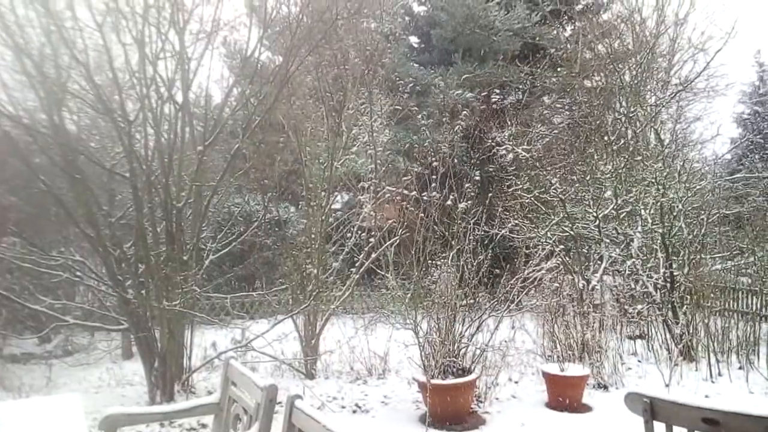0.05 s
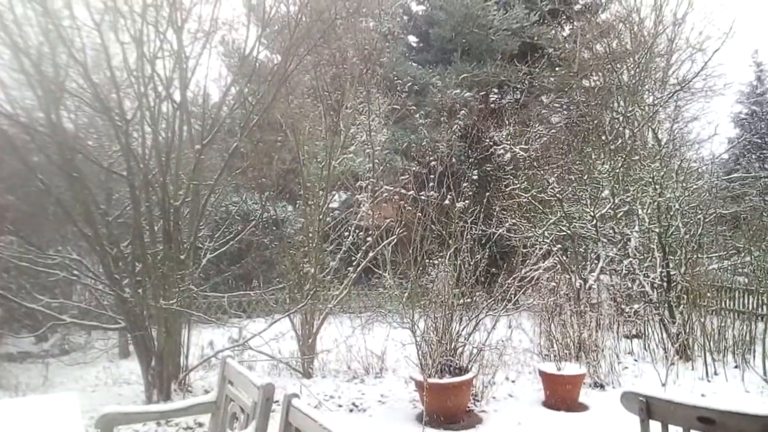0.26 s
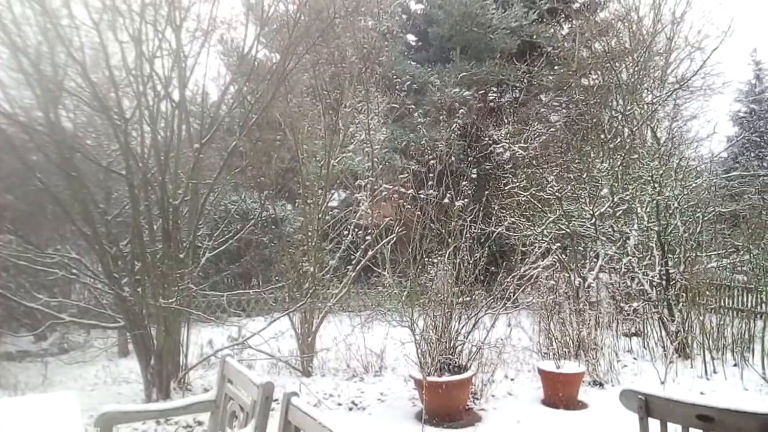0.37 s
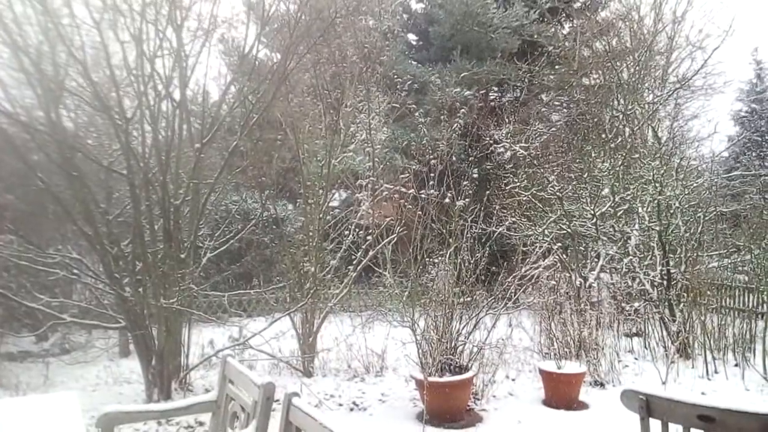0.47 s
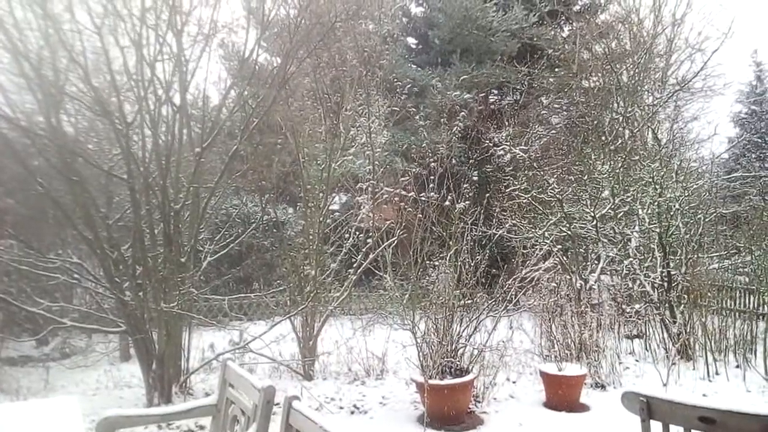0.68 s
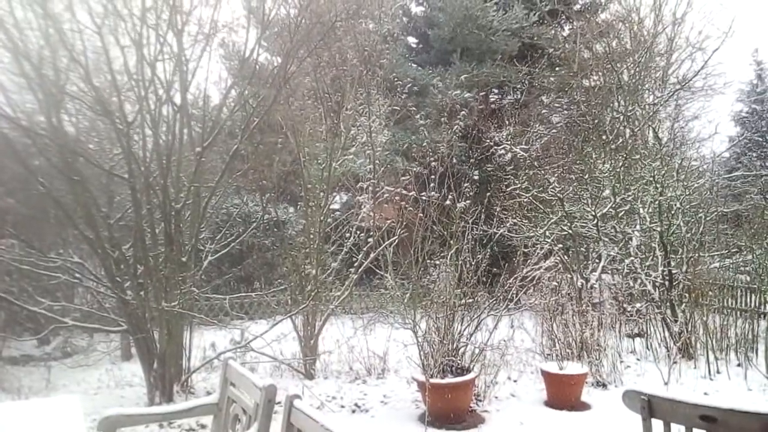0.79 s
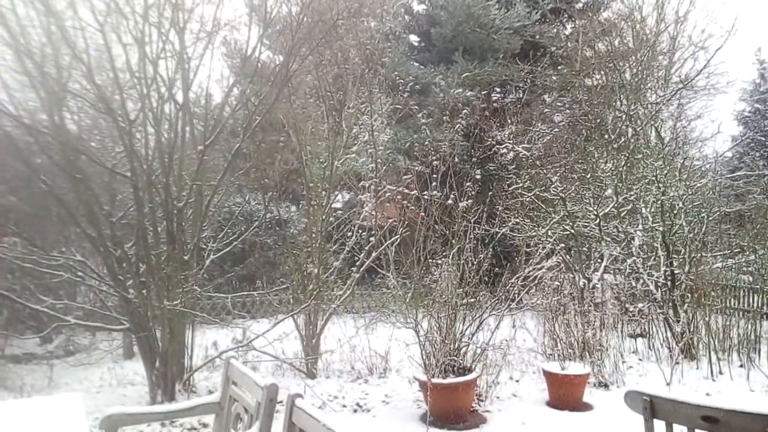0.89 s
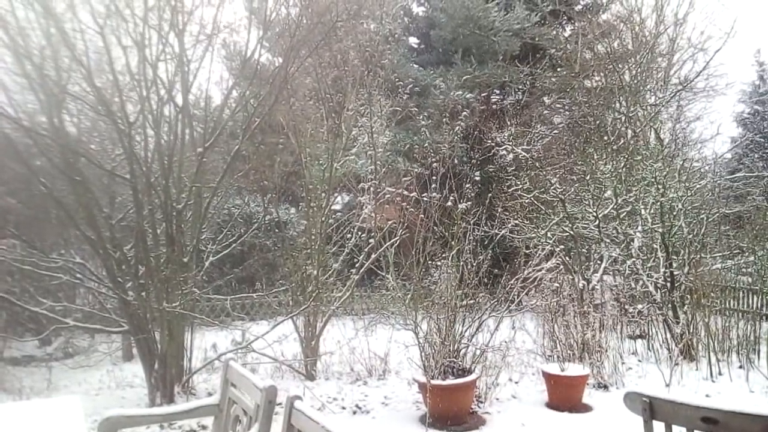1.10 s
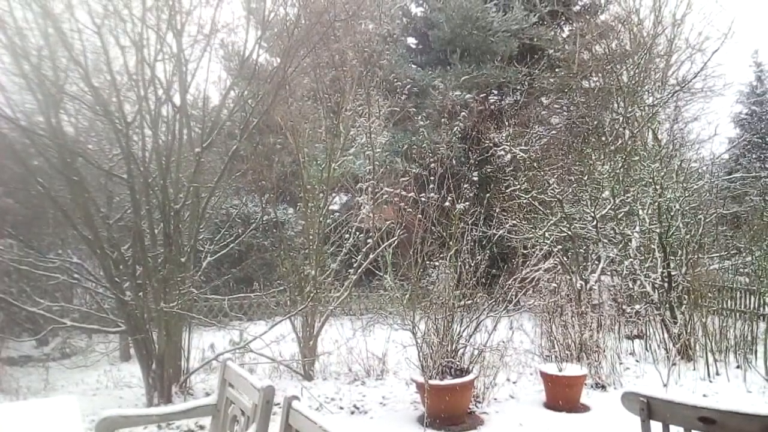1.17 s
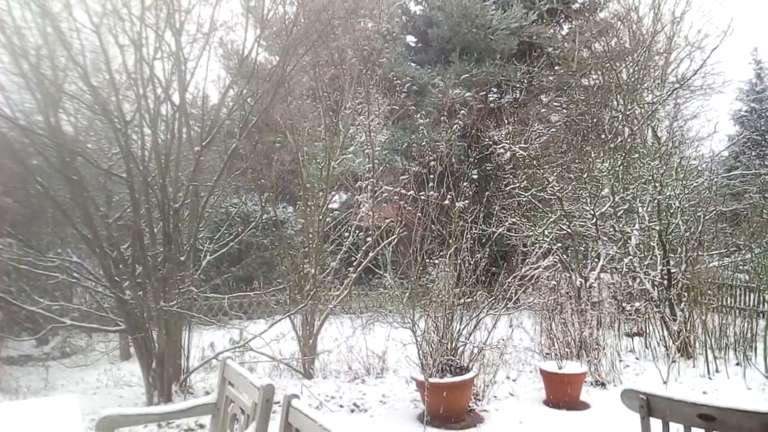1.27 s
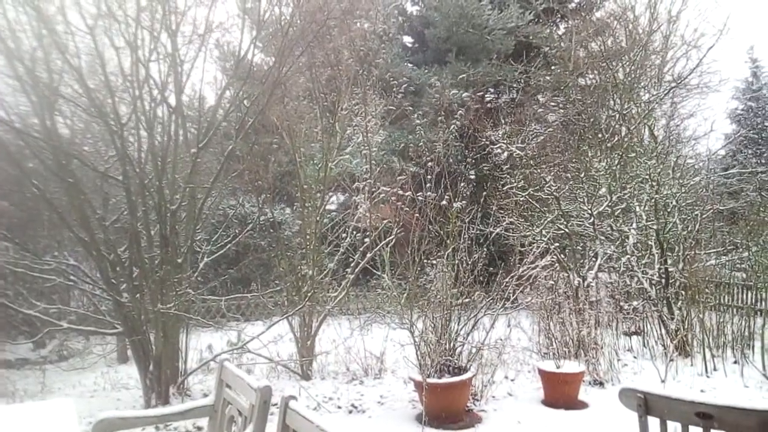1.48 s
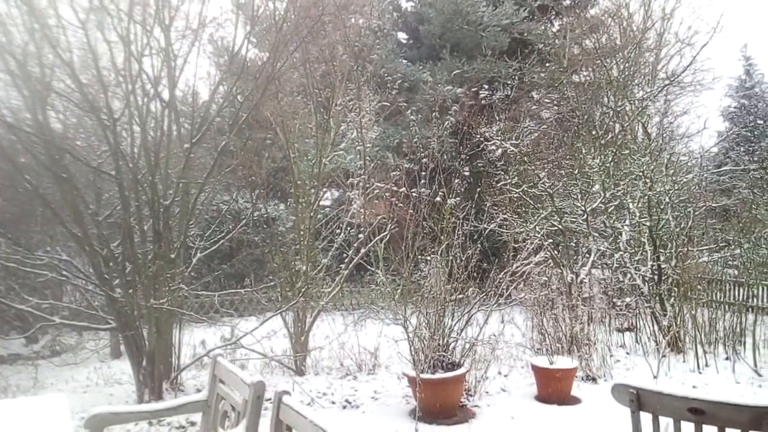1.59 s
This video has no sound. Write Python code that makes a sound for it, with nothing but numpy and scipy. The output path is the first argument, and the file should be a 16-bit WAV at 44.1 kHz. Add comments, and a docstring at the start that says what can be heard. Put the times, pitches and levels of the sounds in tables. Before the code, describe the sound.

Light clicks and a soft knock from a handled camera, against faint outdoor hiss.

```python
"""A faint hiss of still air over a snowy garden, and a low, uneven rumble from a hand-held camera.
Its mechanism ticks four times in a burst, a button clicks, and the case takes a soft knock: each
contact excites heavily damped resonances, and nearby walls reflect it faintly. Far off are a few
faint chirps and one thin call, probably birds, their tones blurred by travelling many paths."""
import sys
import numpy as np
from scipy import signal
from scipy.fft import rfft, irfft
from scipy.io import wavfile

SR = 44100
rng = np.random.default_rng(int(sys.argv[2]) if len(sys.argv) > 2 else 0)


def to_wav(sig):
    """Store sig (one row per channel, or 1-D mono) as 16-bit WAV at the path in sys.argv[1].

    Samples outside -1..1 are clipped; the rate is SR.
    """
    pcm = np.clip(np.atleast_2d(sig), -1, 1) * 32767
    pcm = np.round(pcm).astype(np.int16)
    wavfile.write(sys.argv[1], SR, pcm.T)  # frames by channels


N = 72765
T = np.arange(N) / SR

# Noise spectra of the hiss and the rumble. Each row: frequency in Hz, relative density in dB.
AIR_SPECTRUM = [(20, -8), (60, 0.5), (110, 1), (160, -5.5), (260, -5.5), (450, -9), (800, -11),
                (1500, -15.5), (3000, -15.5), (6000, -16.5), (7800, -26), (10000, -28), (13600, -29.5),
                (14700, -19), (15500, -20.5), (15900, -83)]
RUMBLE_SPECTRUM = [(20, -13.5), (45, -2.5), (68, 7), (100, -9.5), (160, -21), (400, -56)]
# Swells of the rumble. Each row: centre in seconds, half length in seconds, level in dB.
RUMBLE_SWELLS = [(0.147, 0.019, -64.5), (0.185, 0.019, -64), (.235, 0.007, -63.5), (0.899, 0.015, -63),
                 (1.125, 0.037, -70.5), (1.208, 0.011, -67), (1.345, 0.025, -64.5), (1.586, 0.02, -71)]
# Contacts in the mechanism. Each row: time in seconds, gain in dB.
TICK_CONTACTS = [(.23638, -6), (.24290, -.3), (.24708, 0), (.25360, -6)]
# Modes of the struck parts. Each row: frequency in Hz, bandwidth in Hz, relative level in dB.
MECHANISM_RESONANCES = [(1382, 604, -9), (2400, 330, -11.5), (3405, 680, 0), (4340, 400, -13),
                        (5930, 620, -7.5), (7320, 630, -11), (9640, 1250, -11.5), (12150, 2660, -6.5),
                        (15110, 450, 8.5), (16700, 450, -3)]
BUTTON_RESONANCES = [(810, 126, -2.5), (1000, 152, -1), (1772, 380, -1.5), (2517, 260, -9),
                     (3740, 570, -8.5), (5070, 940, -0.5), (6430, 470, -3), (7410, 634, -10.5),
                     (9200, 1630, -16), (11900, 1800, -21.5), (15100, 600, -24)]
CASE_RESONANCES = [(140, 150, -12.5), (270, 77, -15.5), (630, 92, -16), (1300, 450, -27), (2275, 120, -6.5),
                   (2440, 720, -21)]
# Spectra of the wall reflections. Each row: frequency in Hz, relative density in dB.
TICK_ECHO_SPECTRUM = [(100, -4), (420, 1.5), (700, 0), (1200, 2.5), (3000, -4), (6000, -2.5), (8000, -16.5),
                      (13800, -16), (15400, 4), (16200, -37)]
BUTTON_ECHO_SPECTRUM = [(200, -5), (700, 5.5), (1200, 7), (2500, 0), (3500, 6), (6500, 0.5), (8500, -11),
                        (15000, -17)]
KNOCK_ECHO_SPECTRUM = [(50, -13), (110, 5.5), (280, 8.5), (420, -15), (630, 8.5), (950, -14), (1900, -15.5),
                       (2300, -0.5), (3000, -9.5), (5000, -36)]
# Far chirps. Each row: centre in seconds, half length in seconds, pitch in Hz, level in dB.
BIRD_CHIRPS = [(0.71, 0.016, 4720, -80), (0.801, 0.018, 5760, -76.5), (1.15, 0.0034, 4840, -71),
               (1.27, 0.025, 4400, -77.5), (1.42, .018, 5200, -76.5)]
# Course of the call's lower tone. Each row: time in seconds, pitch in Hz, level in dB.
CALL_CONTOUR = [(1.189, 1568, -84), (1.264, 1579, -72.5), (1.314, 1595, -73), (1.35, 1615, -68.5),
                (1.396, 1602, -73), (1.48, 1523, -80)]


def amp(db):
    """Amplitude grows tenfold for every 20 dB."""
    return 10 ** (np.asarray(db) / 20)


def noise(spectrum):
    """Spectral shaping: white noise is weighted by (Hz, dB) points and scaled to unit rms."""
    hz, db = np.array(spectrum).T
    f = np.maximum(np.fft.rfftfreq(N, 1 / SR), 1)
    gain = amp(np.interp(np.log(f), np.log(hz), db))
    y = irfft(rfft(rng.standard_normal(N)) * gain, N)
    return y / y.std()


def drift(rate_hz):
    """Low-passed noise wanders smoothly, here with unit spread."""
    f = np.fft.rfftfreq(N, 1 / SR)
    y = irfft(rfft(rng.standard_normal(N)) * np.exp(-(f / rate_hz) ** 2), N)
    return y / y.std()


def air():
    """Air and microphone hiss are broadband noise, barely wavering in level."""
    level_db = -69 + 0.59 * drift(rate_hz=3.9)
    return amp(level_db) * noise(AIR_SPECTRUM)


def handling():
    """Amplitude modulation: a low rumble swells as the hand shifts."""
    envelope = sum(amp(db) * np.exp(-.5 * ((T - centre) / half_length) ** 2)
                   for centre, half_length, db in RUMBLE_SWELLS)
    return envelope * noise(RUMBLE_SPECTRUM)


def ring(start, modes, lag):
    """Damped modes last inversely to their bandwidth; each pulse peaks lag spreads after start."""
    t, out = T - start, 0
    for hz, bandwidth, db in modes:
        spread = np.sqrt(np.log(2)) / (np.pi * bandwidth)
        pulse = np.exp(-.5 * np.minimum((t / spread - lag) ** 2, 100))
        peak = amp(db) * np.sqrt(2 / np.pi) / (spread * SR)
        out = out + peak * pulse * np.cos(2 * np.pi * hz * t)
    return out


def echo(start, spectrum, db, build_s, t60, late_db, late_t60):
    """Diffuse reflections build up, then decay at two rates; each t60 is the seconds to fall 60 dB."""
    t = np.maximum(T - start, 0)
    build = 1 - np.exp(-(t / build_s) ** 2)
    early = np.exp(-np.log(1000) * t / t60)
    late = amp(late_db) * np.exp(-np.log(1000) * t / late_t60)
    return amp(db) * build * (early + late) * noise(spectrum)


def mechanism():
    """Impulse excitation: four contacts drive the same bright modes, and the walls reflect each."""
    out = 0
    for start, db in TICK_CONTACTS:
        tick = ring(start, MECHANISM_RESONANCES, lag=0)
        walls = echo(start, TICK_ECHO_SPECTRUM, db=-54, build_s=0.00086, t60=0.095,
                     late_db=-17.5, late_t60=0.66)
        out = out + amp(db) * (tick + walls)
    return out


def blurred_tone(hz, blur_hz, clean):
    """Multipath fading: a tone arrives as a clean share plus a randomly fading one."""
    phase = 2 * np.pi * np.cumsum(hz * np.ones(N)) / SR
    scattered = (drift(blur_hz) + 1j * drift(blur_hz)) / np.sqrt(2)
    return np.real((clean + scattered) * np.exp(1j * phase))


def button(start=.5987):
    """Heavy damping makes a plastic click dry; reflections and a faint tone linger after it."""
    click = amp(-2.5) * ring(start, BUTTON_RESONANCES, lag=0.43)
    t, t60 = np.maximum(T - start, 0), 0.84
    decay = (t > 0) * np.exp(-np.log(1000) * t / t60)
    tone = amp(-71.5) * decay * blurred_tone(1260, blur_hz=25, clean=0.51)
    walls = echo(start, BUTTON_ECHO_SPECTRUM, db=-60, build_s=0.00067, t60=0.1,
                 late_db=-8, late_t60=0.72)
    return click + walls + tone


def far_chirps():
    """Small birds give brief tone pulses, blurred by multipath and nearly masked by the hiss."""
    out = 0
    for centre, half_length, hz, db in BIRD_CHIRPS:
        envelope = amp(db) * np.exp(-.5 * ((T - centre) / half_length) ** 2)
        out = out + envelope * blurred_tone(hz, blur_hz=121, clean=0.6)
    return out


def knock(start=1.0952):
    """A soft impact excites the case's modes with a short ping; dull reverberation builds late."""
    case = amp(-1) * ring(start, CASE_RESONANCES, lag=1.38)
    walls = echo(start, KNOCK_ECHO_SPECTRUM, db=-51.5, build_s=.024, t60=0.2,
                 late_db=-16.5, late_t60=0.36)
    return case + walls


def far_call():
    """Scattering among trees smears a thin whistle of nearly level pitch and its weak upper tone."""
    times, hz, db = np.array(CALL_CONTOUR).T
    lower = blurred_tone(np.interp(T, times, hz), blur_hz=75, clean=.2)
    upper = amp(-7) * blurred_tone(2320, blur_hz=75, clean=.2)
    envelope = amp(np.interp(T, times, db, left=-np.inf, right=-np.inf))
    return envelope * (lower + upper)


def scene():
    """Superposition: the pressures of all sources add at one point."""
    return (air() + handling() + mechanism() + button() + far_chirps() + knock() + far_call())[None]


def record(dry):
    """An elliptic low-pass filter cuts the highest treble steeply."""
    cutoff_hz = 16600
    return signal.sosfilt(signal.ellip(8, .2, 70, cutoff_hz, fs=SR, output="sos"), dry)


dry = scene()
out = record(dry)
to_wav(out)
```